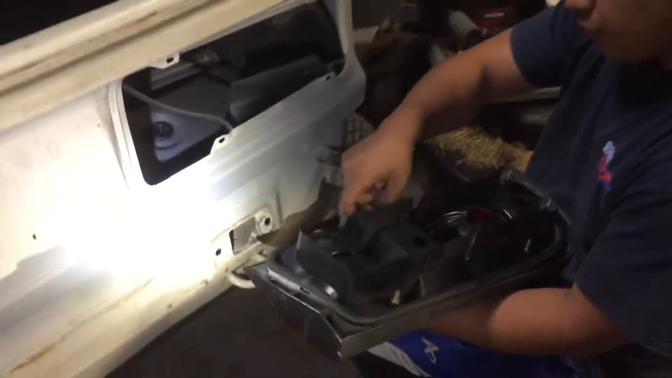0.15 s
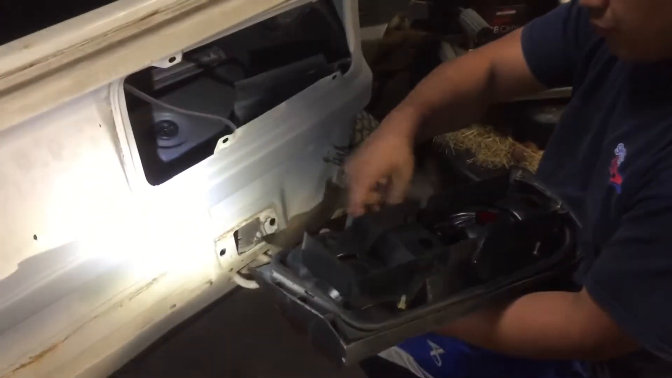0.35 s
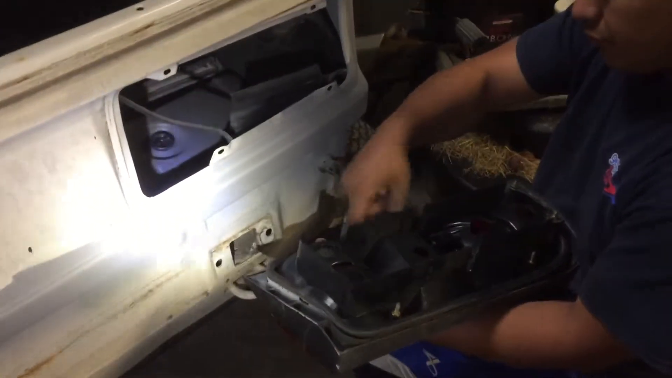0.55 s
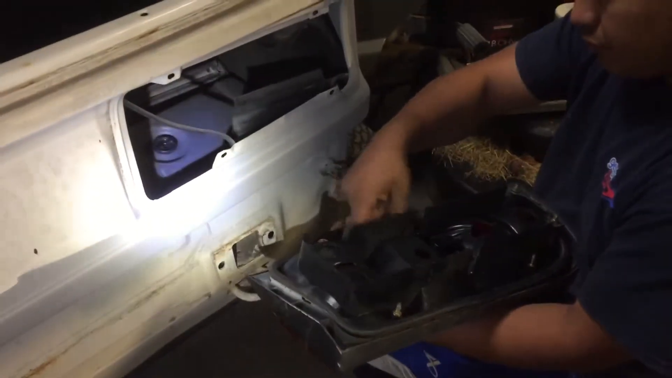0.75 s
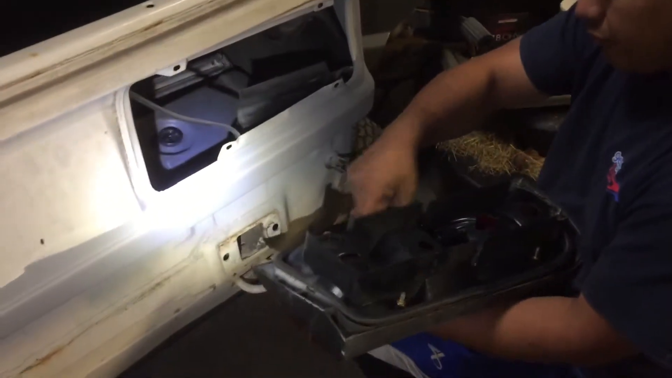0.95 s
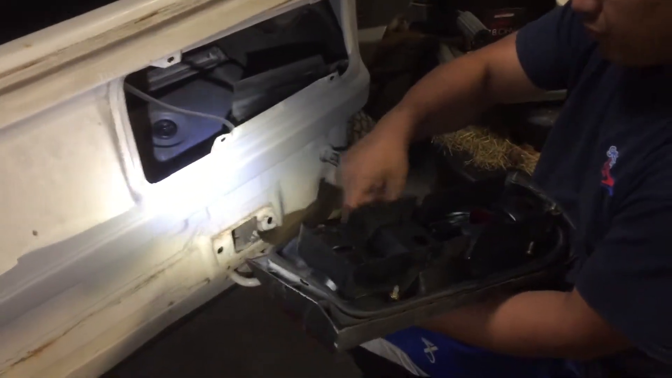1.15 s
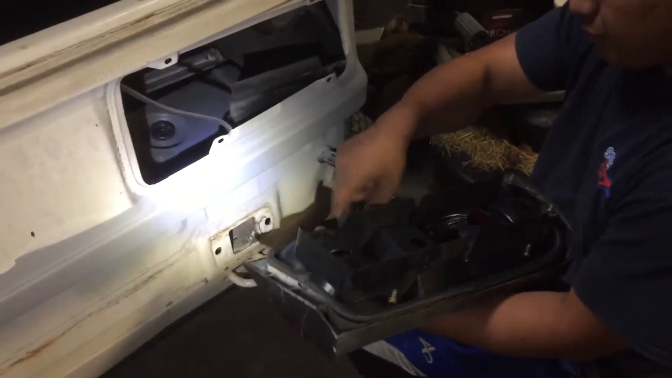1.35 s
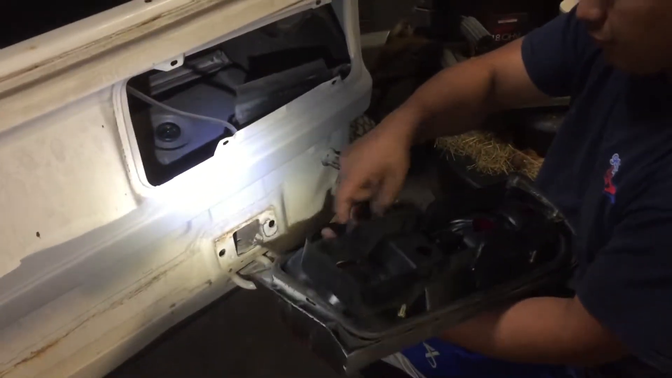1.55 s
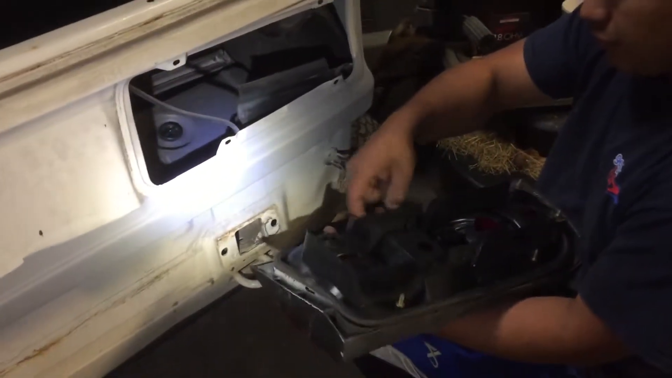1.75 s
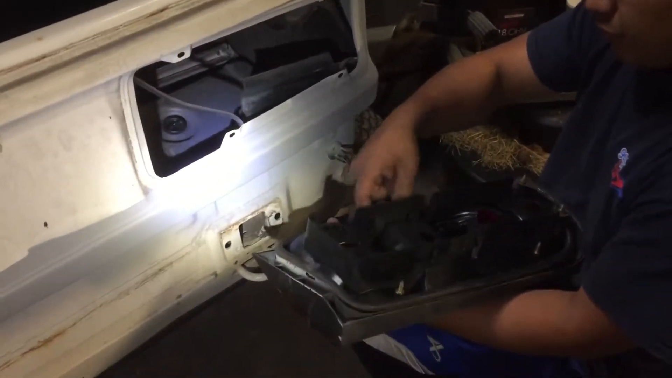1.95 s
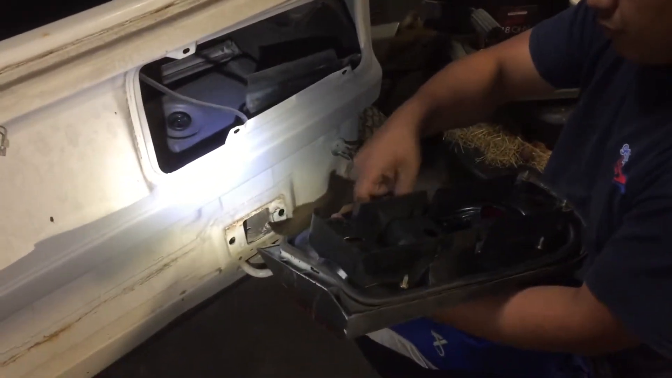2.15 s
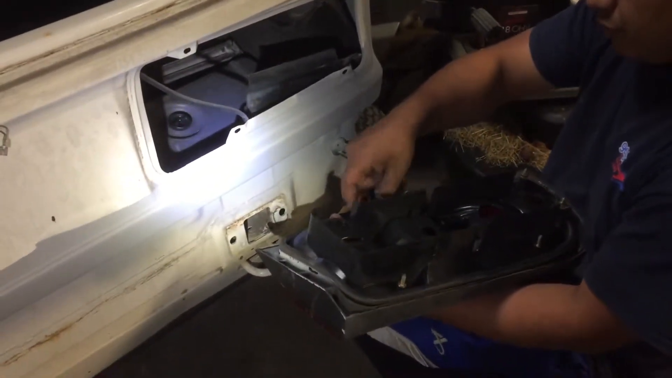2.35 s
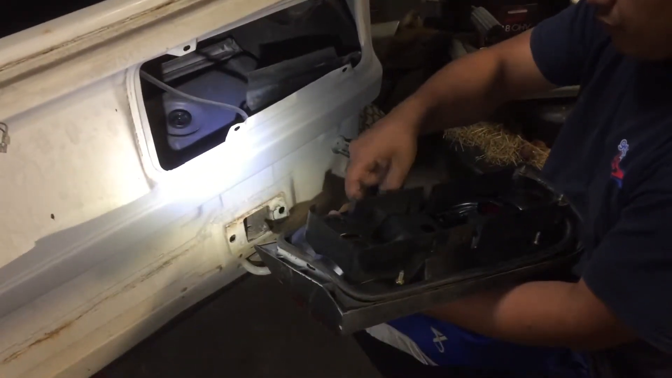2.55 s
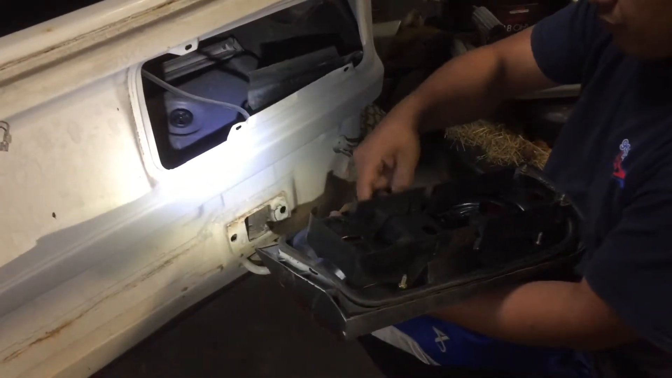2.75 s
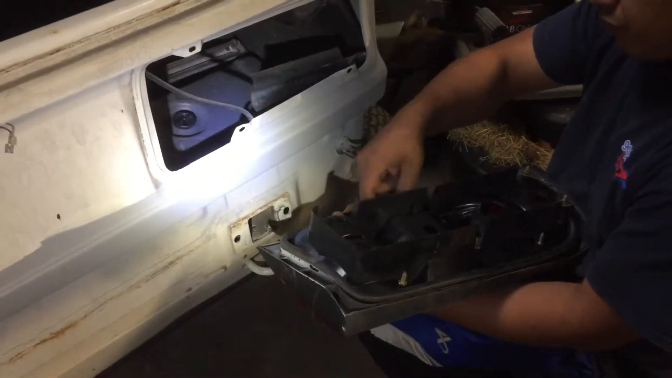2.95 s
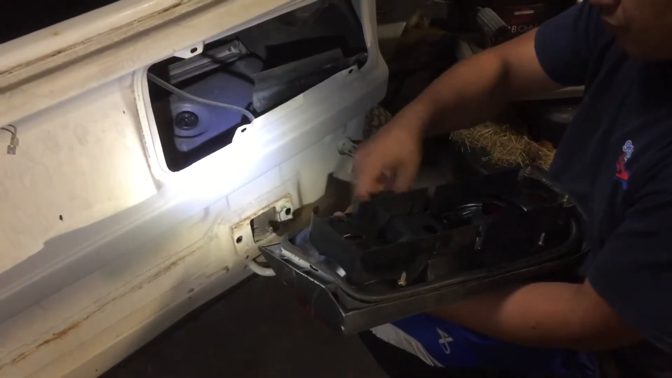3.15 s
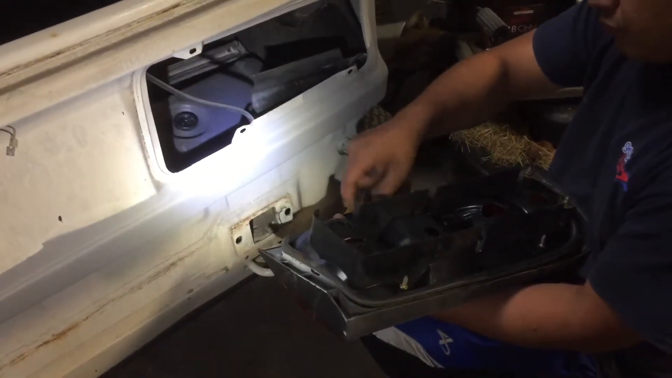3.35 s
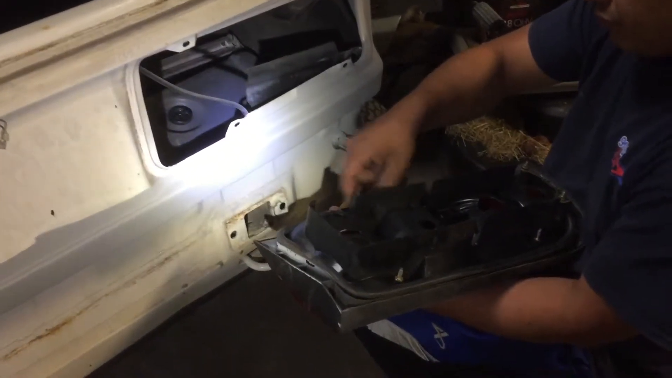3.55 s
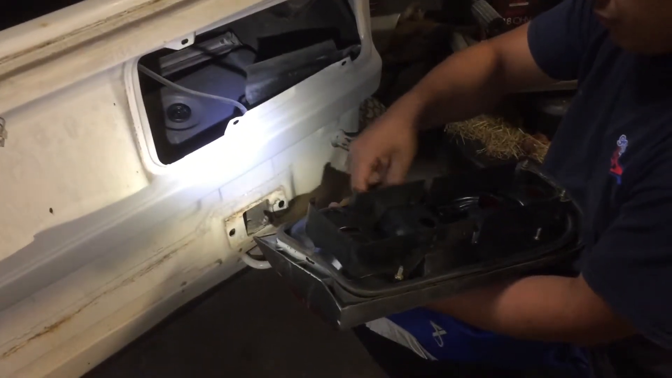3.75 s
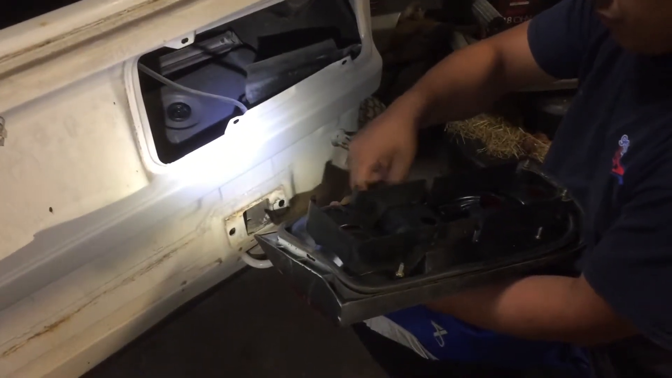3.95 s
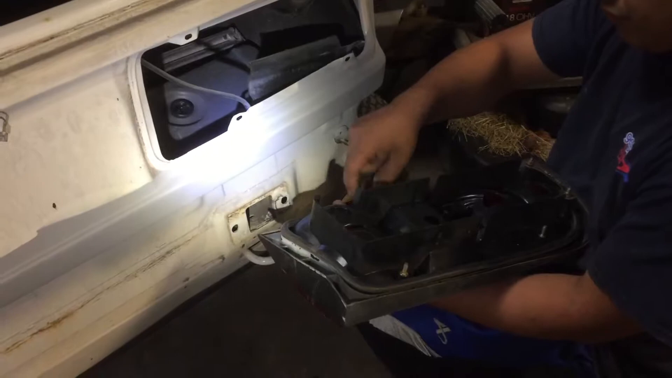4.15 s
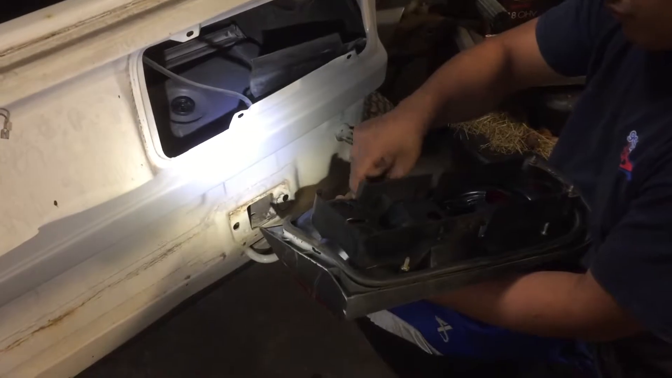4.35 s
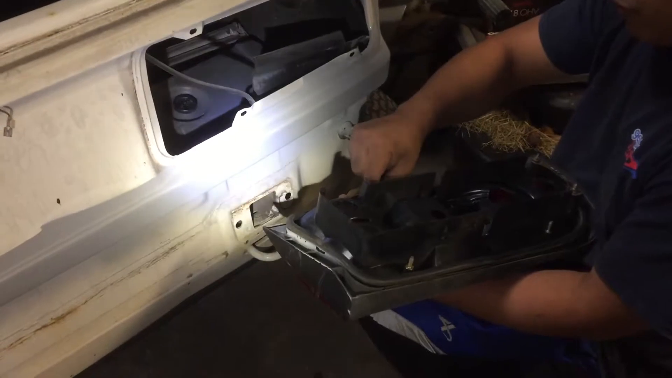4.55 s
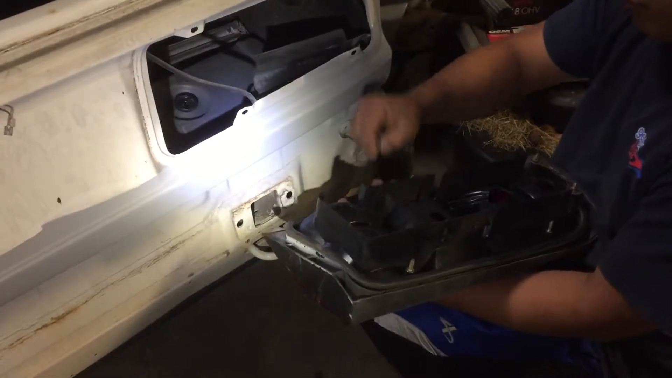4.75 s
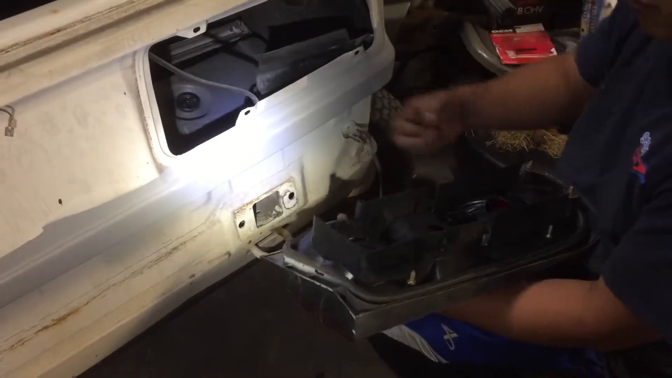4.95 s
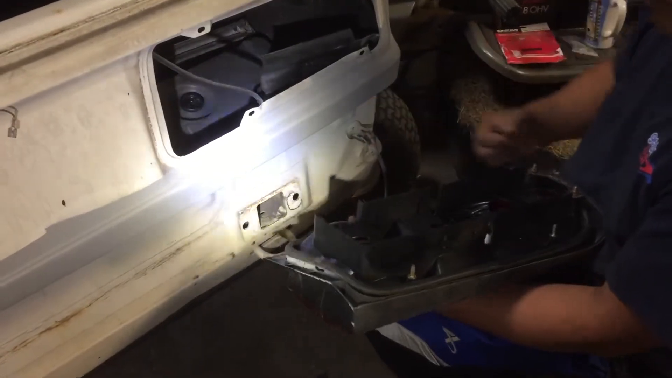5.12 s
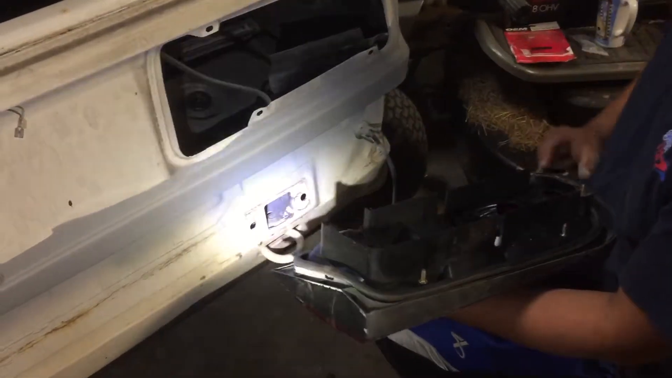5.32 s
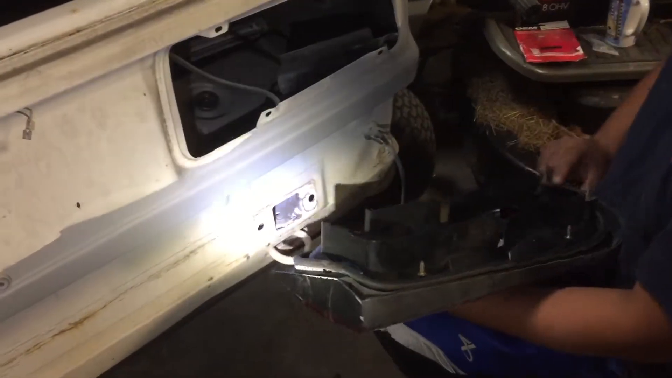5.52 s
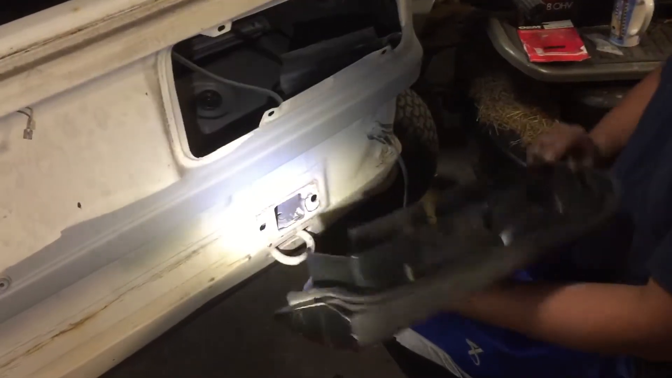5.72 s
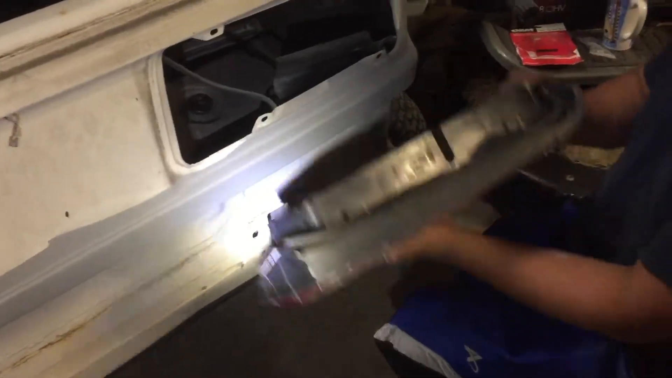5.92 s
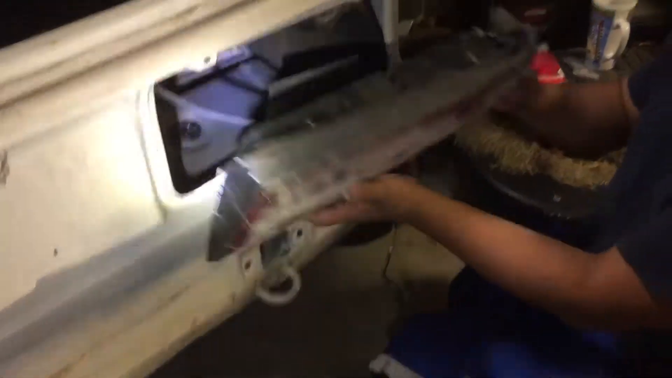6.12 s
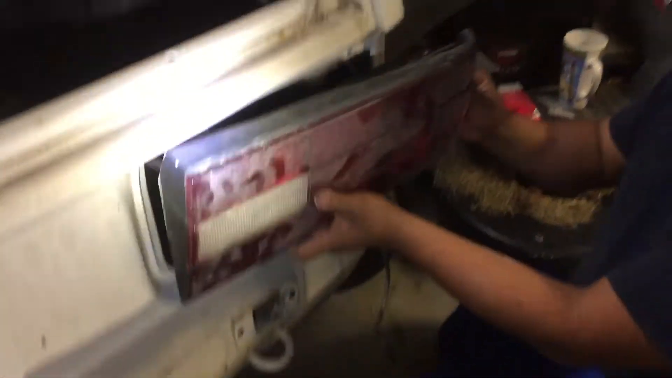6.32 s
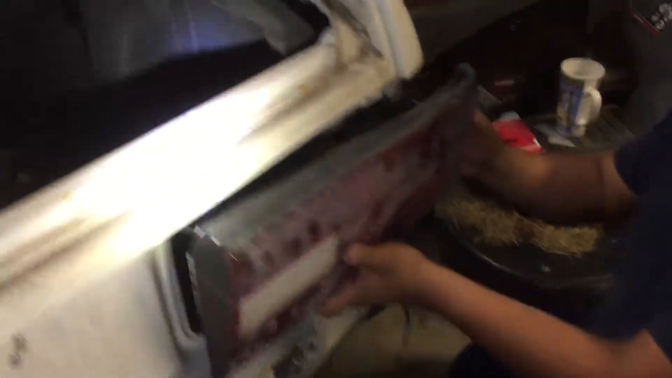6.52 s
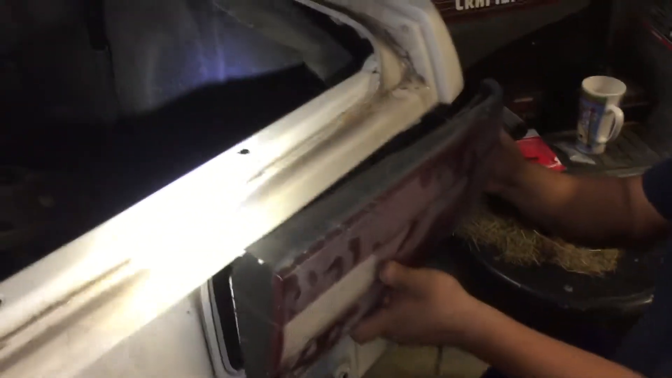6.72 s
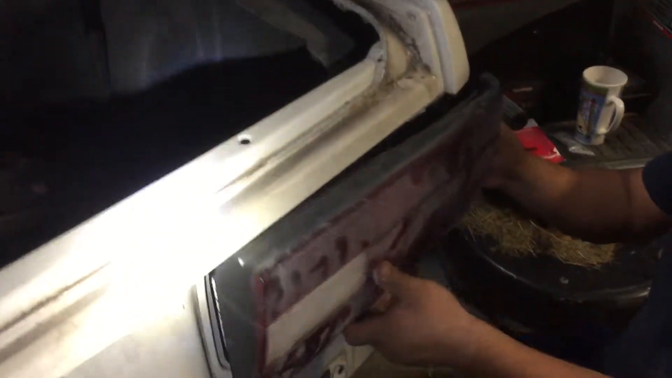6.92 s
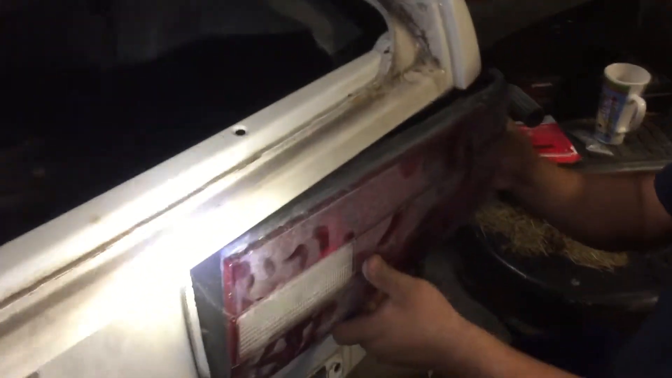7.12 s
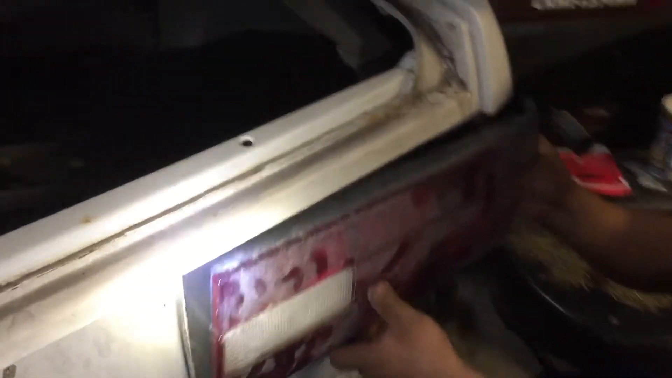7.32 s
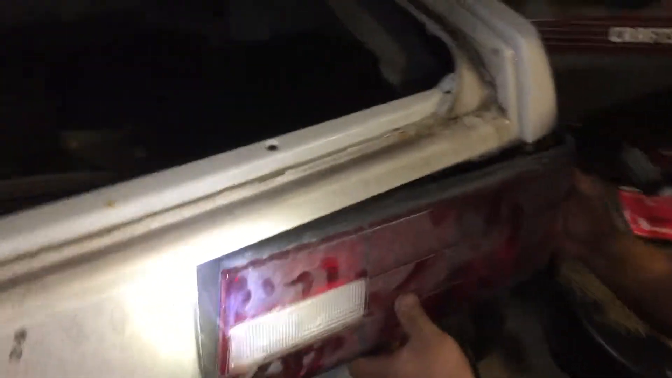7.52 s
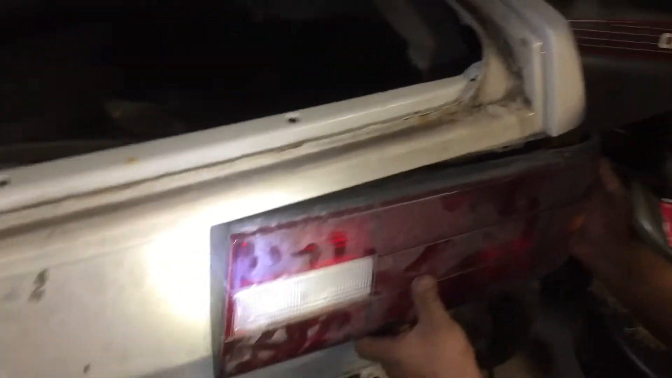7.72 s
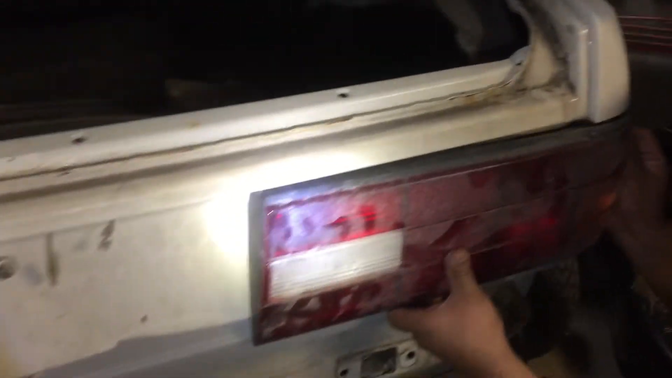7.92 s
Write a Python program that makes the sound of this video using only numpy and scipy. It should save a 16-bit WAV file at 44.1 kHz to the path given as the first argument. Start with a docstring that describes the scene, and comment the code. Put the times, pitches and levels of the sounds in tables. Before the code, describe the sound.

A single small microphone nearby hears quick, uneven ratchet-like clicks and gritty rasps from a plastic housing being twisted by hand. The twisting stops, the part is shifted with light swishes, then it clatters against sheet steel in irregular bursts, each with a hollow thud. One short squeak breaks in. The room reverberation is short, over quiet rumbling, hissing air.

```python
"""At first, in a small garage, fingers twist a fitting on a plastic tail light, about four turns a second:
each is a click (impact on a resonant housing), then a rasp (dense stick-slip noise); one has a low knock.
Next the lamp slides over hands, cloth and paint (rubbing noise) and is knocked into its opening in a bare
steel car body: the rim rings under the clacks, the panel booms (damped modes), and the paint squeaks.
Throughout, filtered noise gives a low rumble with hiss and a faint whine."""
import sys
import numpy as np
from scipy import signal
from scipy.fft import rfft, irfft, next_fast_len
from scipy.io import wavfile
from scipy.ndimage import uniform_filter1d, map_coordinates

SR = 44100
rng = np.random.default_rng(int(sys.argv[2]) if len(sys.argv) > 2 else 0)


def transcribe(u):
    """Save the signal u as a 16-bit wav file named by the first command-line argument.

    u: samples, shape (n,) or (channels, n), limited to [-1, 1]; the rate is SR.
    q: integer samples, one column per channel.
    """
    v = np.clip(np.atleast_2d(u).T, -1, 1)
    q = np.round(v * 32767).astype(np.int16)
    wavfile.write(sys.argv[1], SR, q)


N = 356328  # samples in the scene

# noise spectrum of the room's background: f/Hz, relative density/dB per Hz
AIR_SPECTRUM = [(20, -36), (40, -12), (62, 0), (95, -8.5), (122, 2), (160, -11.5), (230, -13), (400, -27.5),
                (1000, -30), (2000, -34.5), (3300, -42), (9000, -46.5), (11000, -51), (16000, -51)]
# narrow noise bands heard as whine: f/Hz, full width at half gain/Hz, gain/dB on the scale of the air
WHINE_BANDS = [(124, 16, -2.5), (257.2, 21, -11.5), (633, 66, -28.5), (982, 76, -26), (2300, 210, -26),
               (4270, 500, -34.5)]
WHINE_WAVER_DB = 2.5  # scale of the independent swelling of each band
RUMBLE_DB, HISS_DB = -50, -49.5  # gain of the background below and above 350 Hz

# low, mid and treble bands of a contact: from f/Hz, to f/Hz
CONTACT_BANDS = [(430, 1400), (1400, 4000), (4000, 17000)]
# reverberation time of the garage in each of those bands: t60/s
ROOM_T60 = [0.26, 0.23, 0.23]

# modes of the steel panel: f/Hz, level/dB (relative), t60/s
PANEL_MODES = [(64.6, -17, 0.56), (110.4, 0.5, 0.67), (172.6, 2, 0.42), (194.4, 0.5, 0.37),
               (222.5, 1, 0.28), (263, -0.5, 0.21), (307.5, 3, 0.069), (332.4, -1.5, 0.12),
               (402.8, -4, 0.21), (456, -5.5, 0.16)]
# modes of the housing pressed on the steel rim: f/Hz, level/dB (relative), t60/s
RIM_MODES = [(492, -9, 0.19), (575.6, -5.5, 0.17), (625, -6, 0.089), (711, -12, 0.19), (840, -16, 0.24),
             (909, -0.5, 0.066), (938, -2, 0.11), (1014, -5, 0.18), (1205, -4, 0.13), (1296, -6, 0.096),
             (1550, -6.5, 0.14), (1747, 1.5, 0.037), (1880, -7.5, 0.054), (1954, -1, 0.042),
             (2490, -10.5, 0.18), (3570, -2, 0.033), (4590, -7, 0.072), (5900, 2, 0.037)]
# modes of the hollow plastic housing alone: f/Hz, level/dB (relative), t60/s
HOUSING_MODES = [(616, -10, 0.094), (898, -3, 0.1), (1197, -2, 0.073), (1568, -3.5, 0.08),
                 (1734, -2, 0.062), (1963, -3.5, 0.054), (2159, -6, 0.1), (2460, -10, 0.17),
                 (2560, -4, 0.062), (2804, -3.5, 0.046), (3460, 0, 0.045), (4570, -2.5, 0.031),
                 (5450, 4, 0.025), (6700, -1.5, 0.042), (8420, 6, .01), (11380, 4.5, 0.018)]

# spectral colour of fingers on the fitting: f/Hz, gain/dB (relative)
FINGER_COLOUR = [(420, -24), (610, -1), (730, -10), (900, -6), (1230, -5), (1400, -9), (1720, -1.5),
                 (2200, -3.5), (2650, -1), (3200, -8), (3900, -9), (6500, -8), (12500, -9), (16000, -23)]
# spectral colour of the clacks: f/Hz, gain/dB (relative)
RIM_COLOUR = [(300, 19), (540, 3.5), (700, 10.5), (1000, 8), (1400, 0.5), (2000, 5), (3200, -3.5),
              (6200, -6), (7700, -7.5), (10500, -12), (13500, -12.5), (16000, -21)]
# spectral colour of the housing rubbing: f/Hz, gain/dB (relative)
SLIDE_COLOUR = [(300, 2.5), (520, 2.5), (680, 5.5), (1300, -6.5), (2200, 5.5), (4000, -9), (8000, -12.5),
                (13000, -15.5), (16000, -26)]

# turns of the fitting: t/s of the catch, catch mid level/dB, catch treble over mid/dB,
# delay of the slip/s, rasp mid level/dB
FITTING_TURNS = [(0.031, -49, -16, 0.047, -39), (0.286, -47, -1, 0.022, -37.5),
                 (0.515, -42.5, -8.5, 0.048, -37), (0.74, -45, -11, 0.017, -39),
                 (0.978, -38, -8, 0.023, -36), (1.205, -44, -13, 0.02, -35),
                 (1.435, -48.5, 0.5, 0.028, -33.5), (1.698, -34.5, -9, 0.035, -36.5),
                 (1.961, -41.5, -9.5, 0.014, -65), (2.18, -47.5, -26, 0.059, -44.5),
                 (2.471, -35.5, -8.5, 0.026, -47), (2.705, -52, -22, 0.062, -48),
                 (2.961, -37, -7.5, 0.04, -39), (3.212, -41.5, -14, 0.02, -38),
                 (3.466, -36.5, -1.5, 0.032, -37.5), (3.738, -38, -2, 0.05, -44.5),
                 (4, -36.5, 0.5, 0.033, -35), (4.283, -49, -14, 0.026, -40.5),
                 (4.514, -43, -13, 0.055, -48.5)]
CATCH_LOW_DB = -12  # low band of a click, over its mid band
RASP_LOW_DB, RASP_TREBLE_DB = -14, -9  # outer bands of a rasp, over its mid band
BUILD_SHARE, RELEASE_S = 0.35, 0.0048  # rise as a share of the slip delay; decay constant of the release
REGRIP_S, REGRIP_DB = 0.053, -24.5  # brush of the fingers: delay after the slip, gain over the rasp level
# lone clicks of the housing in the hand: t/s, mid level/dB, treble over mid/dB
LONE_CLICKS = [(0.774, -55, 0.5), (1.748, -45, -13), (2.255, -44, -12), (2.792, -50.5, -17),
               (3.78, -40.5, 3), (4.024, -38.5, 3.5), (4.097, -45, -14), (4.364, -52, -24),
               (4.978, -70.5, 18.5), (5.437, -47, -11)]

# slides over hands, cloth and paint: t/s of the peak, rise/s, fall/s, level/dB, tilt/dB per band
SLIDE_EVENTS = [(5.473, 0.044, 0.041, -53.5, -0.5), (5.545, 0.02, 0.015, -68, -19),
                (5.871, 0.1, 0.06, -60.5, 4), (6.215, 0.013, 0.06, -57, 3.5),
                (6.659, 0.044, 0.054, -58, -3), (6.925, 0.039, 0.016, -44, -5.5),
                (7.184, 0.0075, 0.057, -51.5, 2), (7.362, 0.02, 0.03, -49.5, -9),
                (7.48, 0.027, 0.034, -51.5, -6), (7.815, 0.04, 0.11, -50, -6),
                (8.06, 0.02, 0.056, -53.5, -12.5)]
SLIDE_MID_DB = 3  # the mid band stands above the tilt
# squeaks of the plastic on the paint: t/s of the peak, rise/s, fall/s, level/dB
SQUEAK_EVENTS = [(7.472, 0.009, 0.013, -45.5), (7.496, 0.003, 0.0073, -32)]
SQUEAK_HZ, SQUEAK_WIDTH_HZ = 2100, 280  # centre and full width at half gain

# pushes on the panel: t/s, drive level/dB, favoured f/Hz, fall-off/dB per octave away from it
PANEL_PUSHES = [(6.314, -19, 187, 4), (6.707, -20.5, 178, 10.5), (6.746, -29.5, 298, 5),
                (6.945, -15.5, 209, 20), (7.019, -30.5, 150, 1), (7.101, -29.5, 205, 9),
                (7.34, -47, 210, 14), (7.458, -36.5, 225, 14), (7.543, -22.5, 237, 17.5),
                (7.58, -23.5, 196, 16), (7.822, -25.5, 247, 14), (7.877, -14.5, 350, 11.5),
                (7.915, -25.5, 220, 19), (8.05, -38, 190, 20)]
# clacks of the housing: a low knock during the twisting, then chatter against the steel:
# t/s, length/s, mid level/dB, low over mid/dB, treble over mid/dB
CLACK_EVENTS = [(1.963, 0.003, -55, 8, -14), (6.295, 0.0075, -36, -2, -15), (6.312, 0.0105, -29, 1, -8),
                (6.692, 0.022, -30.5, -5.5, -16.5), (6.703, 0.013, -23.5, 6, -11),
                (6.74, 0.016, -29, -19, -8.5), (6.935, 0.007, -20.5, -8, 0.5),
                (6.97, 0.0035, -35, 3.5, -22), (7.021, 0.028, -36, -1.5, -14),
                (7.095, 0.028, -32.5, 2.5, -11), (7.209, 0.01, -42.5, -11, -7),
                (7.501, 0.0059, -28.5, -4, -14), (7.53, 0.017, -30, 6, -10.5),
                (7.559, 0.008, -32.5, -6, -14), (7.572, 0.021, -30.5, -7, -9.5),
                (7.6, 0.019, -34.5, 2, -10.5), (7.814, 0.003, -32, -2, -43), (7.835, 0.0079, -30, -1, -31),
                (7.874, 0.02, -26.5, -1.5, -7), (7.908, 0.0093, -33, -12, -6),
                (8.014, 0.0054, -43.5, 2.5, -29)]
RIM_RING_DB, RING_LOSS = -11, 0.46  # ring over snap; dB of ring lost per dB of treble over mid

TOP_HZ = 16100  # upper band limit


def amp(db):
    """Definition of level: decibels to an amplitude ratio."""
    return 10 ** (np.asarray(db) / 20)


def unit(x):
    """Normalisation to an rms value of 1."""
    return x / np.sqrt(np.mean(x ** 2) + 1e-20)


def along(points, hz):
    """Interpolation of (f/Hz, value) points on a logarithmic frequency axis."""
    f, v = np.transpose(points)
    return np.interp(np.log(hz + 1), np.log(f + 1), v)


def filtered(x, response):
    """Linear filtering: the spectrum of x times a response of frequency."""
    m = next_fast_len(len(x) + 8192)
    spectrum = rfft(x, m)
    hz = np.fft.rfftfreq(m, 1 / SR)
    return irfft(spectrum * response(hz), m)[:len(x)]


def band_pass(x, edges):
    """Causal band limitation by a Butterworth filter."""
    sos = signal.butter(3, edges, "bandpass", fs=SR, output="sos")
    return signal.sosfilt(sos, x)


def resonance(hz, centre_hz, width_hz):
    """Bell-shaped resonance: the gain of one narrow band, 1 at its centre."""
    return 1 / (1 + (2 * (hz - centre_hz) / width_hz) ** 2)


def wobble(rate):
    """Slow random modulation: a smooth curve through rate random knots a second."""
    knots = rng.standard_normal(int(N * rate / SR) + 4)
    return map_coordinates(knots, [np.arange(N) * rate / SR])


def add(track, s, sound):
    """Superposition: mix a sound in, starting at s seconds."""
    start = round(s * SR)
    part = sound[max(-start, 0):max(N - start, 0)]
    track[max(start, 0):][:len(part)] += part


def garage_tail(t60):
    """Diffuse reverberation: exponentially decaying noise of energy 1, drawn afresh."""
    t = np.arange(SR // 2) / SR
    build_up = 1 - np.exp(-t / 0.004)
    tail = rng.standard_normal(len(t)) * amp(-60 * t / t60) * build_up
    return tail / np.linalg.norm(tail)


def swell(rise, fall):
    """Loading and release: pressure grows by a power law, decays exponentially; returns lead time, curve."""
    lead = 2 * rise
    t = np.arange(-lead, 5 * fall, 1 / SR)
    loading = np.abs(1 + t / lead) ** 1.17
    release = np.exp(-np.abs(t) / fall)
    return lead, np.where(t < 0, loading, release)


def body(modes, ring_db, crack_t60):
    """Impulse response by modal superposition: damped modes plus a noise snap and a duller, longer crack."""
    t = np.arange(SR // 3) / SR
    hz, db, t60 = np.transpose(modes)[:, :, None]
    # strength, phase and pitch of the modes shift with the point of contact
    size_db = rng.normal(0, 2.76, hz.shape)
    phase = rng.uniform(0, 2 * np.pi, hz.shape)
    pitch = hz * (1 + rng.normal(0, 0.012, hz.shape))
    envelope = amp(db + size_db - 60 * t / t60)
    ring = np.sum(envelope * np.sin(2 * np.pi * pitch * t + phase), axis=0)
    snap = rng.standard_normal(len(t)) * amp(-60 * t / 0.01)
    crack = band_pass(rng.standard_normal(len(t)), (300, 3500)) * amp(-60 * t / crack_t60)
    return amp(ring_db) * unit(ring) + unit(snap) + amp(-7.5) * unit(crack)


def contact(pressure, slip_rate, grit, answer, levels_db, room_db):
    """Friction as random micro-slips exciting a body; each band's level is its rms over the loudest 8 ms."""
    n = len(pressure)
    slips = rng.standard_normal(n) * (0.12 + (rng.random(n) < slip_rate / SR))
    # the first slip has a fixed size, heard where pressure starts at once, as in clicks and clacks
    slips[0] = 1.43
    # a contact rich in treble is a sharp one, and reaches higher
    sharp_db = np.clip(0.64 * (levels_db[2] - levels_db[1] + 1.0), -7, 16)  # dB per octave above 6 kHz

    def colour(hz):
        """Spectral tilt: the grit's gain with the slope of sharpness added."""
        return amp(along(grit, hz) + sharp_db * np.log2(np.maximum(hz / 6000, 1)))

    sound = filtered(signal.fftconvolve(slips * pressure, answer), colour)
    scatter = filtered(rng.standard_normal(len(sound)), colour)
    out, t = np.zeros(len(sound)), np.arange(len(sound)) / SR
    for edges, t60, db in zip(CONTACT_BANDS, ROOM_T60, levels_db):
        band = band_pass(sound, edges)
        # near surfaces (t60 0.089 s), then the garage, return the energy as a diffuse wash
        energy_decay = amp(-120 * t / t60) + 3 * amp(-120 * t / 0.089)
        energy_decay = energy_decay * (1 - np.exp(-t / 0.00066))
        stored = signal.fftconvolve(band ** 2, energy_decay / energy_decay.sum())[:len(t)]
        wash = np.sqrt(np.abs(stored)) * unit(band_pass(scatter, edges))
        band = band + amp(room_db) * wash
        loudest = np.sqrt(uniform_filter1d(band ** 2, SR // 125).max())
        out += amp(db) * band / loudest
    return out


def background():
    """Stationary noise, slowly modulated: a wavering rumble under steadier hiss and narrow bands of whine."""
    air = filtered(rng.standard_normal(N), lambda f: amp(along(AIR_SPECTRUM, f)))
    for hz, width, db in WHINE_BANDS:
        whine = filtered(rng.standard_normal(N), lambda f: resonance(f, hz, width))
        air = air + amp(db + WHINE_WAVER_DB * wobble(rate=5)) * whine
    air = unit(air)
    low = filtered(air, lambda f: 1 / (1 + (f / 350) ** 4))
    rumble = amp(RUMBLE_DB + 1.2 * wobble(rate=11)) * low
    hiss = amp(HISS_DB + 0.69 * wobble(rate=4.25)) * (air - low)
    return rumble + hiss


def squeaks():
    """Stick-slip: fast, uneven sticking and slipping makes a rough tone, modelled as narrow-band noise."""
    out = np.zeros(N)
    for s, rise, fall, db in SQUEAK_EVENTS:
        lead, pressure = swell(rise, fall)
        noise = rng.standard_normal(len(pressure))
        tone = filtered(noise, lambda hz: resonance(hz, SQUEAK_HZ, SQUEAK_WIDTH_HZ))
        add(out, s - lead, amp(db) * pressure * unit(tone))
    return out


def slides():
    """Sliding friction: under light rubbing, dense slips merge into a swish whose pressure comes and goes."""
    out = np.zeros(N)
    for s, rise, fall, db, tilt_db in SLIDE_EVENTS:
        lead, pressure = swell(rise, fall)
        knots = rng.standard_normal(len(pressure) // 400 + 2)
        position = np.linspace(0, len(knots) - 1, len(pressure))
        grip_db = 2 * np.interp(position, np.arange(len(knots)), knots)
        answer = body(RIM_MODES, ring_db=-1.5, crack_t60=0.024)
        answer[0] += 2 * np.linalg.norm(answer)  # most of the swish radiates straight from the surface
        levels_db = [db - tilt_db, db + SLIDE_MID_DB, db + tilt_db]
        rub = contact(pressure * amp(grip_db), 1900, SLIDE_COLOUR, answer, levels_db, room_db=-3.5)
        add(out, s - lead, rub)
    return out


def click(db, treble_db):
    """Impact excitation: one short, firm contact sets the plastic housing ringing."""
    t = np.arange(SR // 40) / SR
    pressure = np.exp(-(t / 0.0029) ** 2)
    answer = body(HOUSING_MODES, ring_db=0.0, crack_t60=0.048)
    levels_db = [db + CATCH_LOW_DB, db, db + treble_db]
    return contact(pressure, 3000, FINGER_COLOUR, answer, levels_db, room_db=-7)


def fitting():
    """Stick-slip turning: a catch clicks, a rasp builds up and lets go, then the fingers brush back."""
    out = np.zeros(N)
    for s, catch_db, treble_db, slip_s, rasp_db in FITTING_TURNS:
        add(out, s, click(catch_db, treble_db))

        lead, pressure = swell(BUILD_SHARE * slip_s, RELEASE_S)
        answer = body(HOUSING_MODES, ring_db=-2.5, crack_t60=0.012)
        levels_db = [rasp_db + RASP_LOW_DB, rasp_db, rasp_db + RASP_TREBLE_DB]
        rasp = contact(pressure, 700, FINGER_COLOUR, answer, levels_db, room_db=-6.0)
        add(out, s + slip_s - lead, rasp)

        lead, pressure = swell(rise=0.024, fall=0.013)
        noise = rng.standard_normal(len(pressure))
        brush = unit(filtered(noise, lambda hz: amp(along(FINGER_COLOUR, hz))))
        add(out, s + slip_s + REGRIP_S - lead, amp(rasp_db + REGRIP_DB) * pressure * brush)
    for s, db, treble_db in LONE_CLICKS:
        add(out, s, click(db, treble_db))
    return out


def panel():
    """Modal vibration of a plate: it takes milliseconds to swing up, and a push favours modes near one pitch."""
    out, t = np.zeros(N), np.arange(SR) / SR
    hz, db, t60 = np.transpose(PANEL_MODES)[:, :, None]
    for s, push_db, favoured_hz, falloff_db in PANEL_PUSHES:
        drive_db = push_db - falloff_db * np.abs(np.log2(hz / favoured_hz))
        # the shifting pressure of the hands keeps detuning each mode
        knots = rng.standard_normal((len(hz), 45))
        pitch = hz * (1 + 0.035 * signal.resample(knots, len(t), axis=1))
        phase = 2 * np.pi * np.cumsum(pitch, axis=1) / SR + rng.normal(0, 0.39, hz.shape)
        # extra swing while the housing still pushes
        swing = (1 - np.exp(-t / 0.0044)) * (1 + 0.5 * np.exp(-t / 0.017))
        boom = swing * np.sum(amp(db + drive_db - 60 * t / t60) * np.sin(phase), axis=0)
        reverberation = signal.fftconvolve(boom, garage_tail(t60=0.44))[:len(t)]
        add(out, s, boom + amp(-11) * reverberation)
    return out


def clacks():
    """Impact hardness: a low knock, then chatter on the steel; the softer the contact, the more of it is ring."""
    out = np.zeros(N)
    for s, length, db, low_db, treble_db in CLACK_EVENTS:
        t = np.arange(0, 2 * length, 1 / SR)
        pressure = np.exp(-(t / length) ** 3.0)
        answer = body(RIM_MODES, RIM_RING_DB - RING_LOSS * treble_db, crack_t60=0.018)
        levels_db = [db + low_db, db, db + treble_db]
        add(out, s, contact(pressure, 1800, RIM_COLOUR, answer, levels_db, room_db=-5.5))
    return out


def scene():
    """Superposition of all the sources on one channel."""
    mix = background() + squeaks() + slides() + fitting() + panel() + clacks()
    return mix[None]


def record(dry):
    """Band limitation: the small microphone sheds deep bass, and nothing is kept above the upper limit."""
    high_pass = signal.butter(2, 42, "highpass", fs=SR, output="sos")
    thin = signal.sosfilt(high_pass, dry)
    return np.array([filtered(channel, lambda hz: hz < TOP_HZ) for channel in thin])


dry = scene()
out = record(dry)
transcribe(out)
```